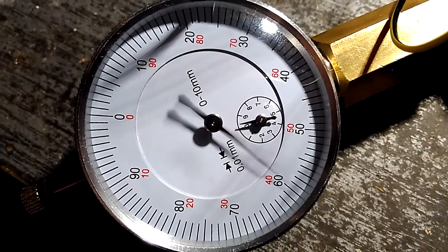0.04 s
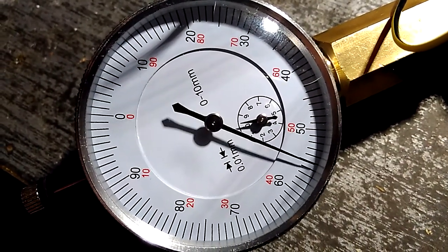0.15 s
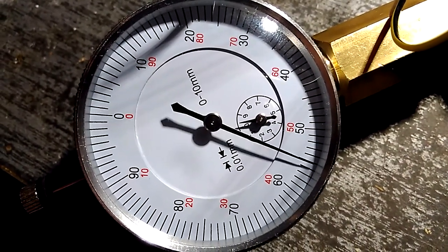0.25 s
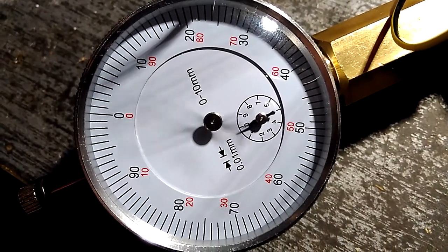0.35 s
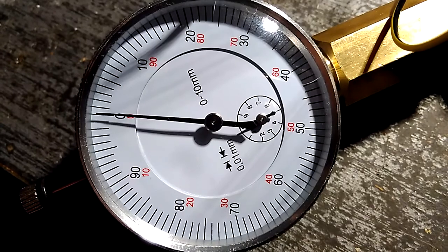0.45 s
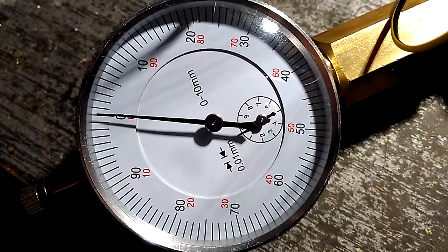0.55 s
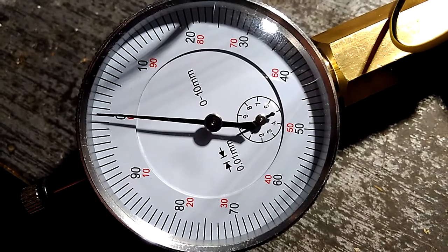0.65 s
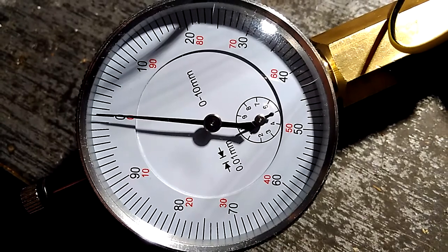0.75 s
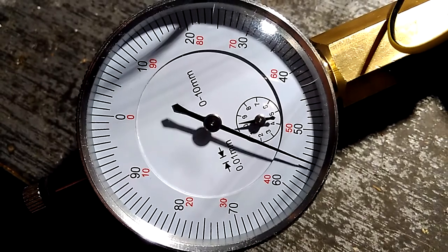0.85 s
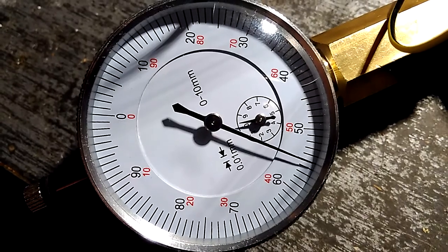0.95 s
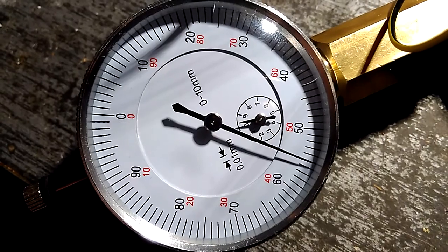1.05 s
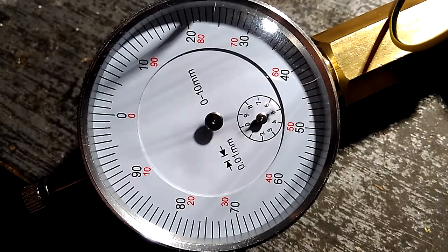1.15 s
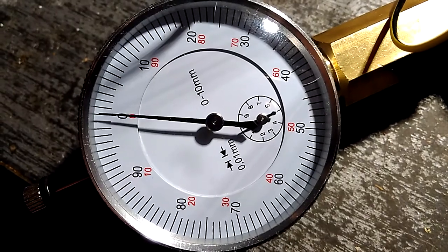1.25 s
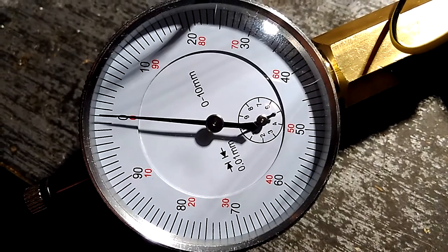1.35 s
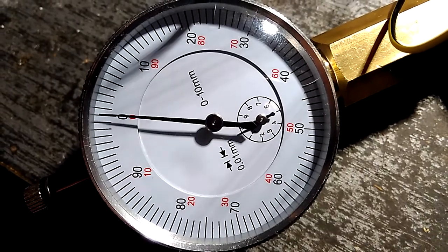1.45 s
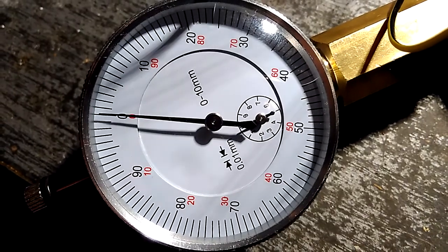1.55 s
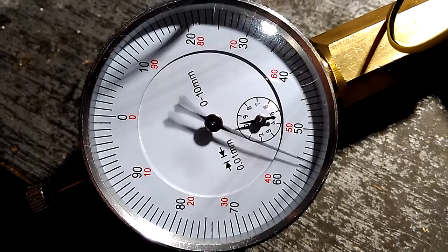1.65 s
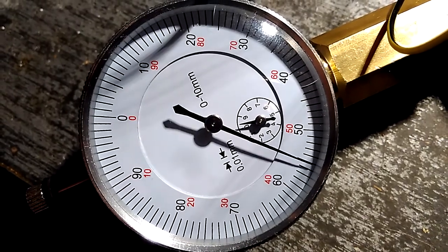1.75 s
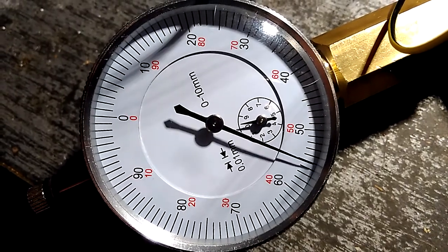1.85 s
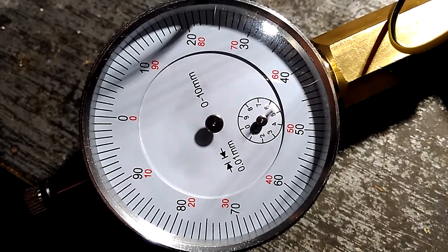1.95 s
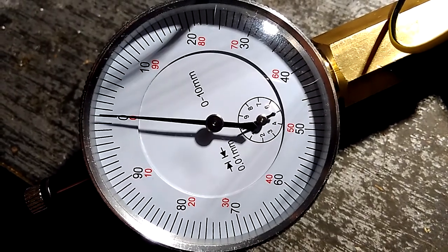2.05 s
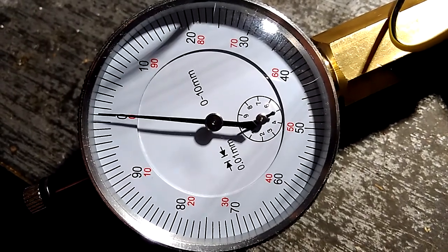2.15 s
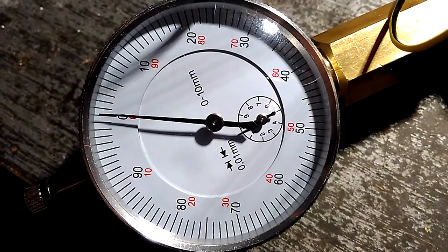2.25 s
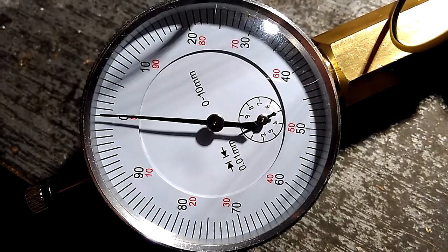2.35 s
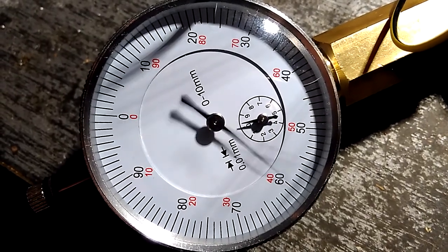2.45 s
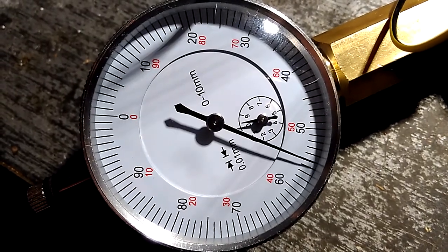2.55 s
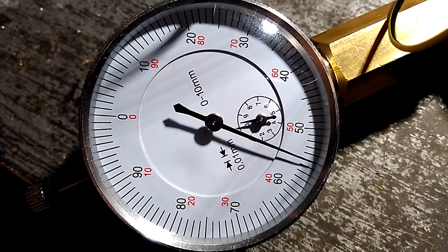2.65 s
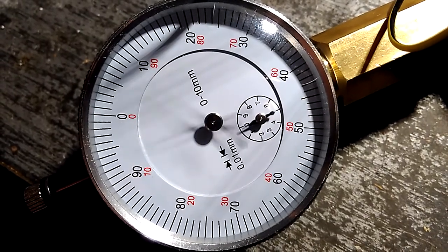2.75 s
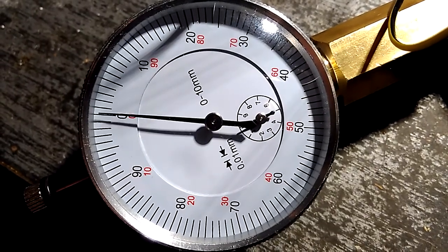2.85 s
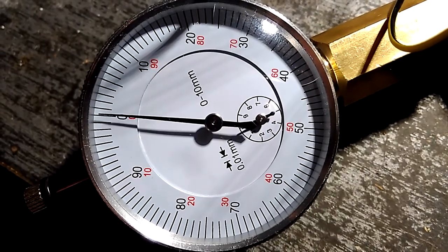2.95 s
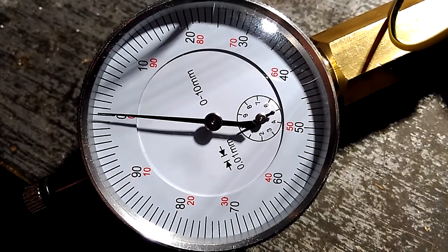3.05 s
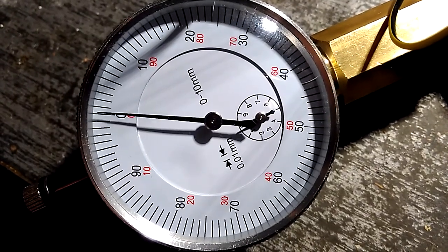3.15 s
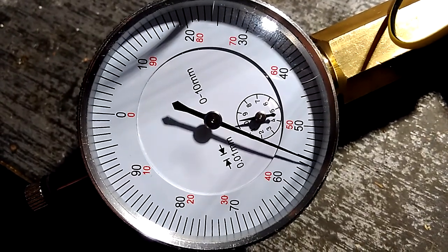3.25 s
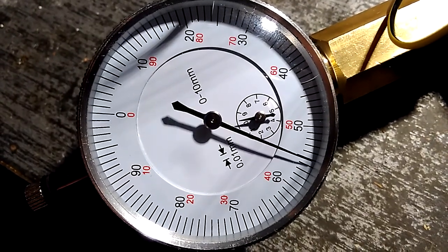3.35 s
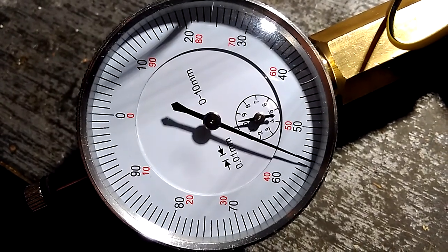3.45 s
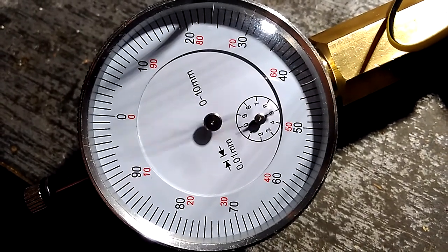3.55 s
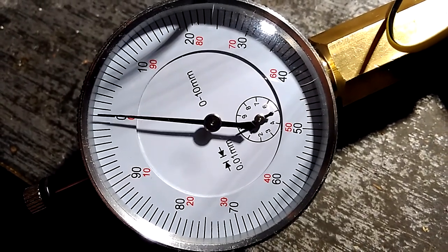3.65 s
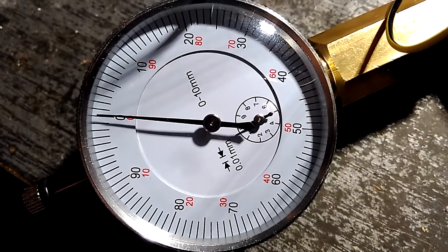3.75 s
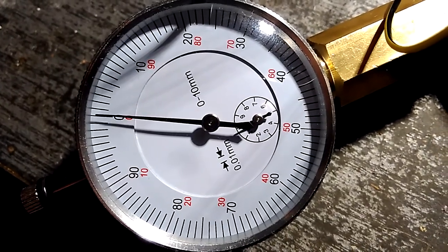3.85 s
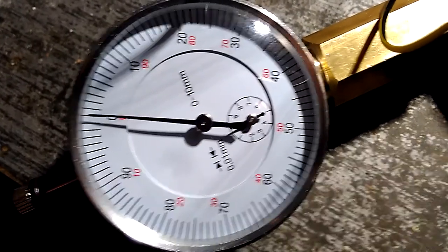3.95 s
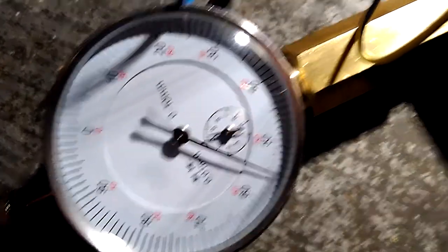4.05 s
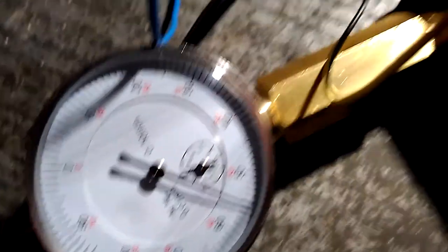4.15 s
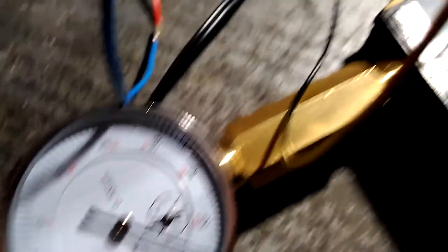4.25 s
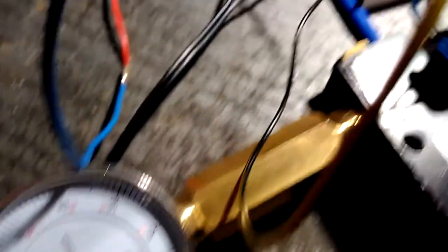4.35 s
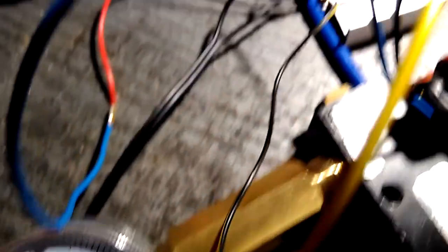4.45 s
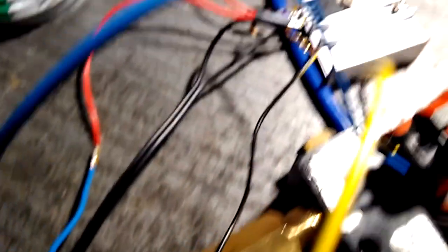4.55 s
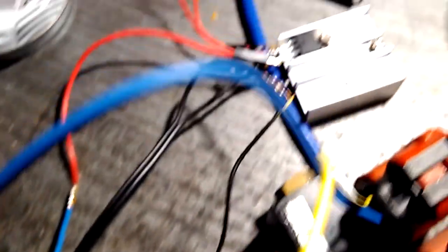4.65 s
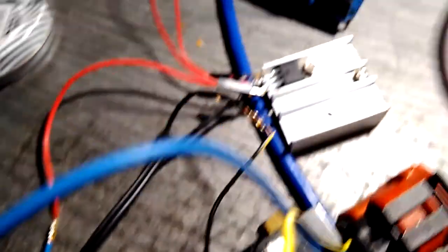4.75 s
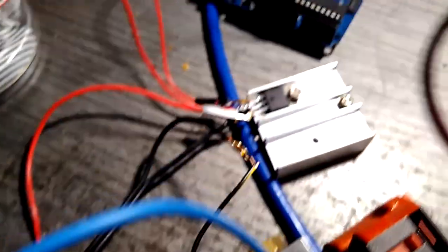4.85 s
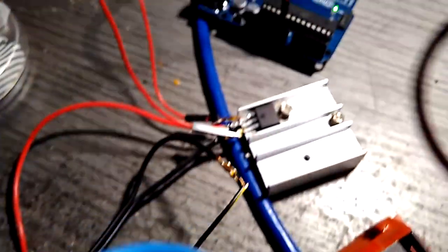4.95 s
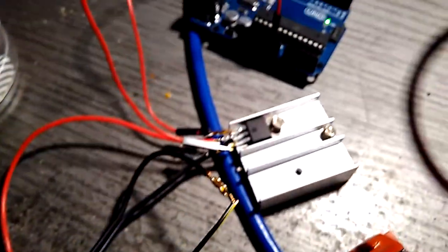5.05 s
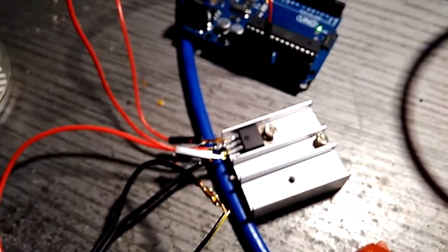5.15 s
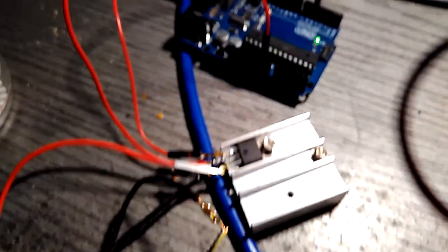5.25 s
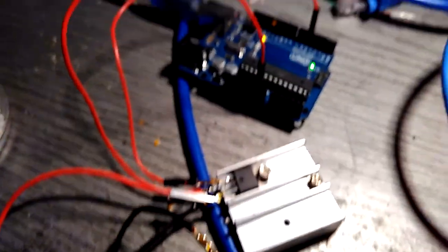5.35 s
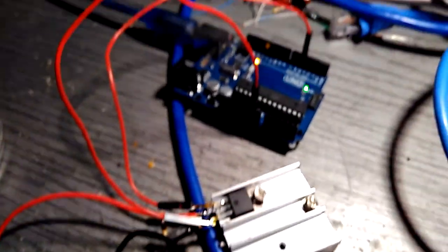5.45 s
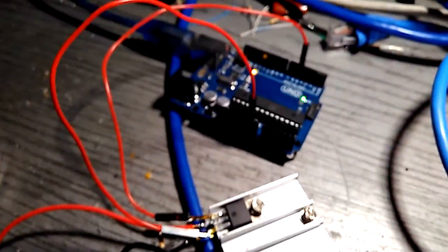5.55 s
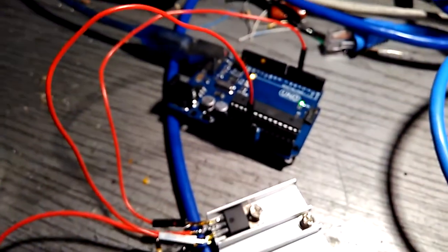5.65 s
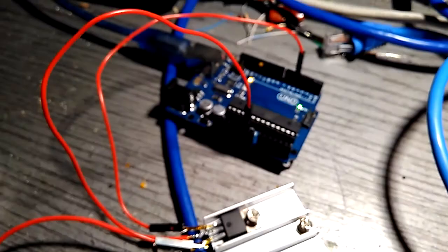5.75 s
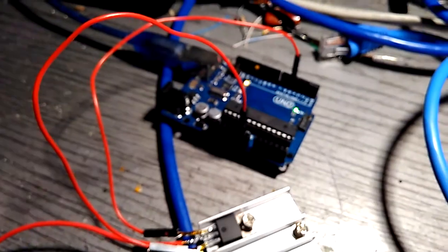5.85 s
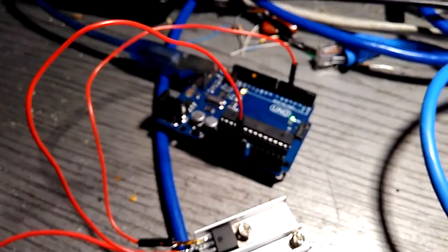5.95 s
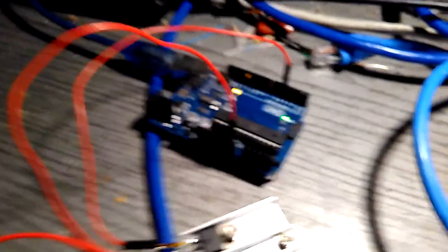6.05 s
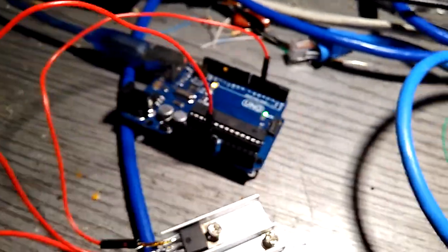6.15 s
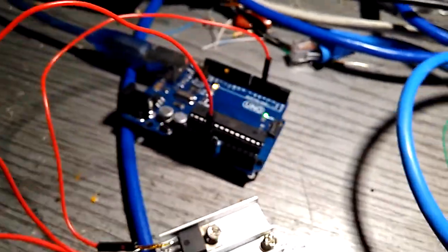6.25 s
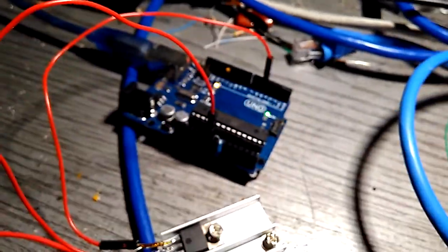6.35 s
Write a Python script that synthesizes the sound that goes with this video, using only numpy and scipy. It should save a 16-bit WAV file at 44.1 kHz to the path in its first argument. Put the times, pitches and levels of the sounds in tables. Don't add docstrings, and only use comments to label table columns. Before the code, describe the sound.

Close up on a workbench, a solenoid pulls in with a metallic clack and releases 0.3 seconds later with a louder, brighter one, repeating every 0.8 seconds. Gear teeth in a dial gauge chatter and bounce after each blow, and the bench knocks beneath. A hand-held stereo microphone turns away late, dulling the strokes slightly over low hum and quiet hiss, with tiny handling clicks.

```python
import sys
import numpy as np
from scipy import signal
from scipy.fft import rfft, irfft, next_fast_len
from scipy.io import wavfile
from scipy.ndimage import uniform_filter1d, map_coordinates

SR = 44100
rng = np.random.default_rng(int(sys.argv[2]) if len(sys.argv) > 2 else 0)


def persist_wave(psi):
    counts = np.round(np.clip(psi, -1, 1) * 32767).astype(np.int16)
    wavfile.write(sys.argv[1], SR, np.atleast_2d(counts).T)


def decibels_to_gain(level_db):
    exponent = np.asarray(level_db, float) / 20
    return 10 ** exponent


N = 281799

# start_s, level_db, gear_treble_db
PULL_INS = [(0.0705, -12, -6.5), (0.8713, -11.5, -7), (1.6712, -11, -7), (2.4713, -11.5, -8),
            (3.271, -11.5, -7), (4.072, -11.5, -8), (4.8722, -12.5, -11), (5.671, -14, -8.5)]
LET_GOES = [(0.3815, -9, -2.5), (1.1807, -9.5, -0.7), (1.9797, -8, -2), (2.7809, -8.5, -0.8),
            (3.5813, -8, -0.6), (4.3824, -9, -4.5), (5.1812, -10.5, -5.5), (5.9824, -11.5, -4.5)]
# after_blow_ms, rise_ms, t60_ms, strength_db, gear_ring_over_it_db
PULL_CONTACTS = [
    (-0.53, .3, 26, 1.1, -2),
    (4.1, 3.2, 15, -2.05, 3.5),
    (13.5, 12, 82, -12.5, 4),
    (20.5, 8, 13, -5.5, 7),
    (24, 2.1, 9.2, -9.5, -0.1),
    (29.5, 2.8, 35, -16.5, -7.5),
    (45.5, 4, 46, -23.5, -7),
]
RELEASE_CONTACTS = [(-14, .6, 51, -25, -7), (-4, 6.2, 34, -11.5, -6.5), (0.05, 1.3, 23, 0.37, 0),
                    (8.5, 3.5, 59, -10, -0.4), (26.5, 2.7, 35, -21, -10.5), (41, 14, 55, -12.5, 2.2),
                    (50, 2.4, 17, -4, -3), (49.5, .6, 8.7, -10, 7.5), (58, 2.1, 55, -12, -8),
                    (80.5, .6, 22, -30.5, 8.5), (86, 2.5, 100, -29, -6)]
# after_blow_ms, t60_ms, knock_db, thud_db
PULL_BLOWS = [(-0.34, 15, 1.9, 4.5), (14.5, 13, -19.5, -6), (20, 22, -1.5, -9.5), (29.5, 28, -12.5, -7.5),
              (45, 60, -28, -16.5)]
RELEASE_BLOWS = [(-11.5, 54, -14, -8), (-0.72, 47, -3.5, -2), (20.5, 30, -23, -11), (41, 30, -18, -21.5),
                 (47.5, 95, -9.5, -6.5), (56, 49, -13.5, -5), (81.5, 15, -21, -22.5),
                 (90.5, 31, -29.5, -19)]
# time_s, turned_away_0_to_1, left_port_nearer_db
CAMERA_AIM = [(0, 0.02, -0.25), (3.6, 0.14, 1.2), (4.1, 0, 1), (4.4, .9, 1), (5.2, .9, 4), (6, 0.9, 3.5)]
# centre_hz, width_hz, level_db
CASE_MODES = [(1929, 300, -12.5), (2352, 260, -6), (2750, 250, -4.5), (3014, 170, -1.5), (3271, 170, -1),
              (3660, 170, -9), (4050, 63, -13.5)]
# centre_hz, width_hz, level_db
LEFT_FACING = [(5260, 1300, -20.5), (5800, 2700, -5.5), (6380, 1800, -5), (9270, 450, -7.5),
               (10470, 450, -8), (11760, 500, -8), (12600, 360, -7), (14300, 2100, -7)]
RIGHT_FACING = [(5040, 1900, -17), (6160, 1000, -10.5), (7280, 580, -9.5), (8123, 260, -1),
                (9255, 230, -11.5), (10475, 550, -10.5), (11400, 550, -29), (13735, 770, -26)]
# centre_hz, width_hz, level_db
LEFT_TURNED = [(5020, 650, -6.5), (6660, 830, -7.5), (8160, 1000, -4.5), (9300, 900, -5),
               (10550, 910, -2.5), (11500, 860, -0.84), (13710, 740, -5.5)]
RIGHT_TURNED = [(4620, 700, -10), (5800, 700, -10), (7900, 550, -1), (9650, 1000, -12.5),
                (10400, 600, -8.5), (11700, 900, -15.5), (13300, 900, -17.5)]
# centre_hz, width_hz, level_db
BENCH_KNOCK = [(872, 100, -0.5), (1305, 65, 7.5), (1530, 710, -4)]
BENCH_THUD = [(113, 16, -3), (196, 47, -9), (305, 50, -4.5), (410, 45, -3), (530, 110, -18.5)]
# frequency_hz, t60_s
ROOM_DECAY = [(100, .35), (500, 0.16), (2000, 0.23), (5000, 0.37), (12000, 0.51)]
# frequency_hz, left_db_per_hz, right_db_per_hz, left_right_likeness
HUSH_SPECTRUM = [(25, -118, -118, -.3), (56, -95.5, -92.5, -0.2), (90.5, -97, -99, -.7),
                 (200, -99, -99, -0.2), (400, -101, -102, -0.6), (800, -103, -105, -0.2),
                 (1540, -111, -112, 0.5), (3000, -113, -113, 0.1), (5500, -118, -117, -0),
                 (7900, -113, -112, 0.8), (9900, -105, -112, 0.4), (13000, -106, -114, -0.1),
                 (13950, -111, -118, 0.1), (14700, -140, -140, .05)]
# frequency_hz, width_hz, left_db, right_db
SUPPLY_LINES = [
    (119.6, 11, -64, -68),
    (12985, 20, -80.5, -88),
    (960, 30, -84, -90),
]
CLICK_STARTS = 5.4357, 6.1003, 6.112, 4.1595, 2.64, 5.26
# frequency_hz, t60_ms, left_db, right_db
CLICK_RINGS = [
    [(11200, 2.1, 9.5, -33), (6600, 1.9, -20, -41), (7460, 2.8, -24, -17.5), (4300, 5.8, -23.5, -52),
     (1851.9, 11, -42, -51)],
    [(10450, 5.2, -16.5, -23.5), (6850, 1.1, -26.5, -8.5), (4120, 15, -43, -25.5), (2100, 2.7, -29, -14),
     (1080, 2.7, -27.5, -14.5), (478, 15, -54, -25.5), (62.4, 116, -39.5, -34.5)],
    [(10700, 6.1, -32.5, -50)],
    [(10700, 7.6, -32, -54), (12300, 5, -35, -54)],
    [(490, 170, -56.5, -63.5), (780, 150, -60.5, -73), (950, 110, -57.5, -73)],
    [(75, 240, -58, -55)],
]
PULL = dict(rebound_db=(-1, -1), duller_db=1.44, rebound_ms=18.5, lean_db=0.5)
RELEASE = dict(rebound_db=(-0.34, 0.46), duller_db=-4.5, rebound_ms=32.5, lean_db=2)
SCATTER_DB = 1.1


def unit(x):
    return x / np.sqrt(np.mean(x ** 2, axis=-1, keepdims=True) + 1e-20)


def between(ends, share):
    return ends[0] + (ends[1] - ends[0]) * np.clip(share, 0, 1)


def camera_aim():
    s, *columns = np.transpose(CAMERA_AIM)
    return [np.interp(np.arange(N) / SR, s, column) for column in columns]


def filtered(x, response):
    m = next_fast_len(N + SR // 2)
    return irfft(rfft(x, m) * response(np.fft.rfftfreq(m, 1 / SR)), m)[..., :N]


def resonant(x, modes):
    def response(f):
        h = 0
        for k, (centre, width, db) in enumerate(modes):
            damping = 1j * f * width
            h = h + (-1) ** k * decibels_to_gain(db) * damping / (centre * centre - f * f + damping)
        return h / np.sqrt(np.mean(np.abs(h) ** 2))
    return filtered(x, response)


def wobble(rate):
    knots = rng.standard_normal(int(N * rate / SR) + 4)
    return map_coordinates(knots, [np.arange(N) * rate / SR])


def chatter(spread_db):
    return unit(rng.standard_normal(N) * decibels_to_gain(spread_db * wobble(800)))


def hush():
    hz, left_db, right_db, alike = np.transpose(HUSH_SPECTRUM)

    def at(column, f):
        return np.interp(np.log(f + 1), np.log(hz), column)

    def half_angle(f):
        return np.arccos(np.clip(at(alike, f), -1, 1)) / 2

    z = signal.stft(rng.standard_normal((2, N)), nperseg=512)[2]
    patches = uniform_filter1d(rng.standard_normal(z.shape[1:]), 6, 0)
    patches = uniform_filter1d(patches, 14, 1)
    patchy = signal.istft(z * decibels_to_gain(1.5 * patches / patches.std()), nperseg=512)[1][:, :N]
    pair = unit(patchy) * np.sqrt(SR / 2)
    mid, side = filtered(pair, lambda f: np.array([np.cos(half_angle(f)), np.sin(half_angle(f))]))
    ports = np.array([mid + side, mid - side])
    air = filtered(ports, lambda f: decibels_to_gain([at(left_db, f), at(right_db, f)]))
    bass = filtered(air, lambda f: 1 / (1 + (f / 300) ** 4))
    hand_db = 5 + 2.1 * wobble(7) + 1.13 * wobble(2.5)
    hiss_db = between((-0.3, 2), camera_aim()[0])
    return (air - bass) * decibels_to_gain(hiss_db) + bass * decibels_to_gain(hand_db)


def supply():
    t = np.arange(N) / SR
    out = np.zeros((2, N))
    for hz, width, left_db, right_db in SUPPLY_LINES:
        tone = np.sqrt(2) * np.sin(2 * np.pi * hz * t + wobble(width))
        out += tone * decibels_to_gain(1.5 * wobble(width)) * decibels_to_gain([[left_db], [right_db]])
    return out * [[1], [-1]]


def clicks_and_knocks():
    out, t = np.zeros((2, N + SR)), np.arange(SR // 4) / SR
    onset = 1 - np.exp(-t / .00015)
    for s, parts in zip(CLICK_STARTS, CLICK_RINGS):
        start = round(s * SR)
        for hz, t60_ms, left_db, right_db in parts:
            ring = -np.sin(2 * np.pi * hz * t) * decibels_to_gain(-60000 * t / t60_ms) * onset
            out[:, start:start + len(t)] += decibels_to_gain([[left_db], [right_db]]) * ring
    return out[:, :N]


def room(x):
    out = np.zeros((2, N + SR))
    cuts = np.sort([s - .03 for s, *_ in PULL_INS + LET_GOES] + [N / SR])
    hz, t, z = signal.stft(rng.standard_normal((len(cuts), 2, SR // 2)), SR, nperseg=256)
    room_hz, room_t60 = np.transpose(ROOM_DECAY)
    t60 = np.interp(np.log(hz + 1), np.log(room_hz), room_t60)
    tails = signal.istft(z * decibels_to_gain(-60 * t / t60[:, None]), SR, nperseg=256)[1]
    edges = np.round(cuts * SR).astype(int)
    delay = 300
    for tail, a, b in zip(tails, edges, edges[1:]):
        wet = signal.fftconvolve(x[:, a:b], tail / np.linalg.norm(tail[0]), axes=1)
        out[:, a + delay:a + delay + wet.shape[1]] += wet
    return out[:, :N]


def strokes(events, contacts, kind, bright, scatter_db):
    power, blows = np.zeros((2, len(bright), N + SR))
    lead = SR // 20
    ms = np.arange(-lead, SR // 4) / SR * 1000
    turned = camera_aim()[0]
    for s, db, treble_db in events:
        luck = rng.standard_normal((len(contacts), 2))
        start = round(s * SR) - lead
        rebound_db = between(kind["rebound_db"], turned[round(s * SR)])
        for (at, rise, t60, *levels), (late, strong) in zip(contacts, luck):
            after = ms - at - .3 * late * (at > 8)
            shape_db = np.where(after < 0, 20 * after / rise, -60 * after / t60)
            level = db + np.array(levels) + treble_db * np.array(bright)
            level = level + scatter_db * strong + rebound_db * (at > kind["rebound_ms"])
            power[:, start:start + len(ms)] += decibels_to_gain(2 * (level[:, None] + shape_db))
            blows[:, start + np.argmax(shape_db)] += decibels_to_gain(level) * (rise < 1.2)
    return np.array([np.sqrt(power[:, :N]), blows[:, :N]])


def both_strokes(pull, release, bright, scatter_db):
    pulls = strokes(PULL_INS, pull, PULL, bright, scatter_db)
    return pulls + strokes(LET_GOES, release, RELEASE, bright, scatter_db)


def bench_levels(blows):
    rise_ms = 0.52
    return [(at, rise_ms, t60, db, db - 3, thud_db) for at, t60, db, thud_db in blows]


def bench():
    turned = camera_aim()[0]
    pull, release = bench_levels(PULL_BLOWS), bench_levels(RELEASE_BLOWS)
    force, blows = both_strokes(pull, release, (0, 0, 0), SCATTER_DB / 2)
    drive = force * [chatter(spread_db=3.0) for _ in force] + decibels_to_gain([[24], [24], [33]]) * blows
    left, right = decibels_to_gain(-17.5) * resonant(drive[:2], BENCH_KNOCK)
    thud = filtered(resonant(drive[2], BENCH_THUD), lambda hz: (1j * hz / (90 + 1j * hz)) ** 2)
    thud = thud * decibels_to_gain(between((-30, -38), turned) - 3.5)
    pair = np.array([left + decibels_to_gain(3.0) * thud, -np.roll(right, -9) - decibels_to_gain(-2.5) * thud])
    return decibels_to_gain(between((-1.6, -4.4), turned)) * pair


def gear_levels(contacts, kind):
    lean = kind["lean_db"] / 2
    rows = []
    for at, rise, t60, db, ring_db in contacts:
        dull_db = kind["duller_db"] * ((abs(at) > 2) + (at < -2))
        rows.append((at, rise, t60, db + lean, db - lean, db + dull_db, db + ring_db))
    return rows


def gauge():
    turned, lean_db = camera_aim()
    case_pan, treble_pan = 0.8 * lean_db, 1.3 + lean_db
    pull, release = gear_levels(PULL_CONTACTS, PULL), gear_levels(RELEASE_CONTACTS, RELEASE)
    force, blows = both_strokes(pull, release, (0, 0, 1, 1), SCATTER_DB)

    shared, own = chatter(spread_db=2.5), chatter(spread_db=3.5)
    share = 0.45
    right = share * np.roll(shared, -2) + np.sqrt(1 - share ** 2) * own
    drive = force[:2] * np.array([shared, right]) + decibels_to_gain(11.0) * blows[:2]
    case = decibels_to_gain(-4.5) * resonant(drive, CASE_MODES) * decibels_to_gain([case_pan / 2, -case_pan / 2])

    teeth = force[2:] * [chatter(spread_db=1.7), chatter(spread_db=3.0)] + decibels_to_gain(12.5) * blows[2:]
    facing = np.array([resonant(teeth[0], LEFT_FACING), resonant(teeth[1], RIGHT_FACING)])
    away = np.array([resonant(teeth[0], LEFT_TURNED), resonant(teeth[1], RIGHT_TURNED)])
    treble = (1 - turned) * facing + turned * away
    return case + decibels_to_gain(3.5) * treble * decibels_to_gain([treble_pan / 2, -treble_pan / 2])


def scene():
    metal, wood = gauge(), bench()
    echo = room(decibels_to_gain([[-23.5], [-31]]) * metal + decibels_to_gain(-12.5) * wood)
    return metal + wood + echo + hush() + supply() + clicks_and_knocks()


def top_cut(x):
    return signal.sosfilt(signal.butter(12, 16180, fs=SR, output="sos"), x)


def record(dry):
    def band_limit(hz):
        return decibels_to_gain(-np.clip((hz - 14150) / 18, 0, 24) - np.clip((hz - 15200) / 60, 0, 30))
    x = filtered(dry, band_limit)
    x = x / (1 + np.abs(x) ** 8) ** (1 / 8)
    return top_cut(x)


dry = scene()
out = record(dry)
persist_wave(out)
```